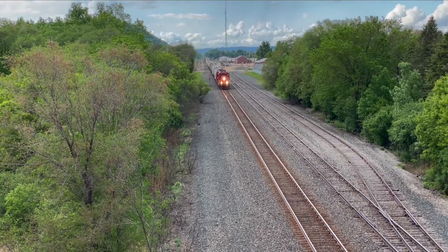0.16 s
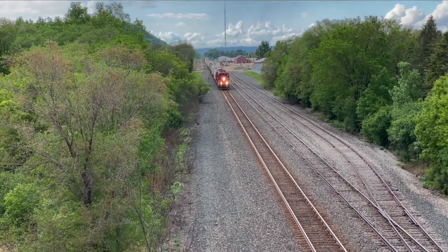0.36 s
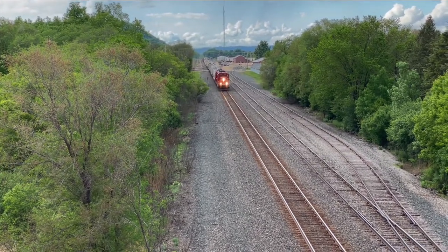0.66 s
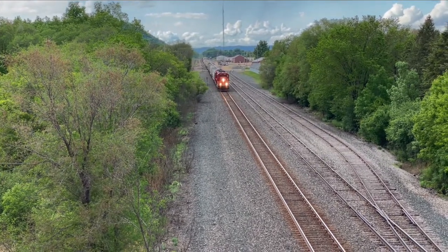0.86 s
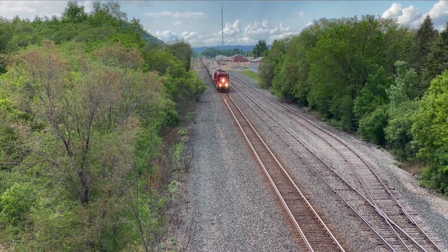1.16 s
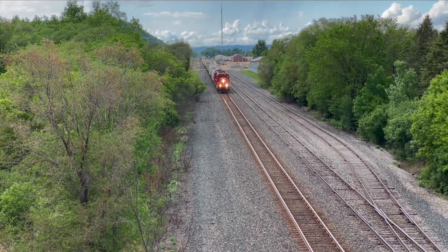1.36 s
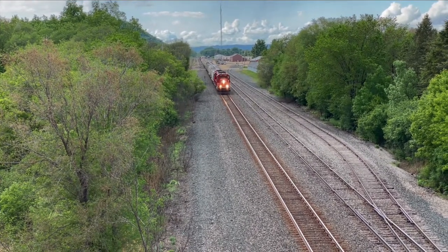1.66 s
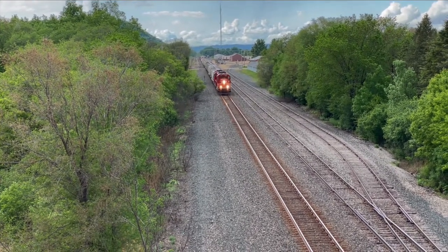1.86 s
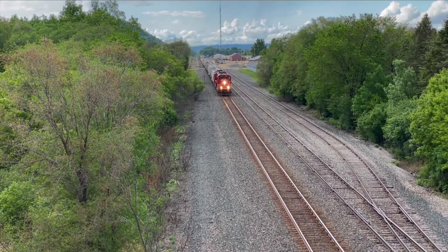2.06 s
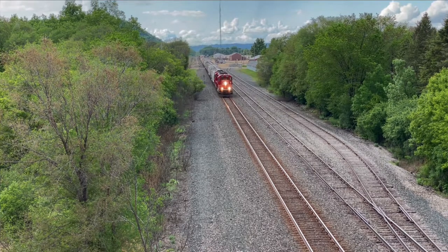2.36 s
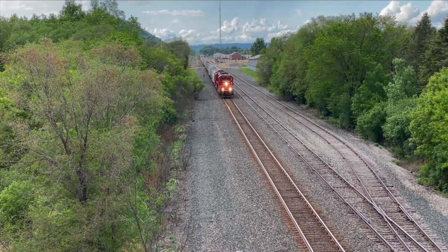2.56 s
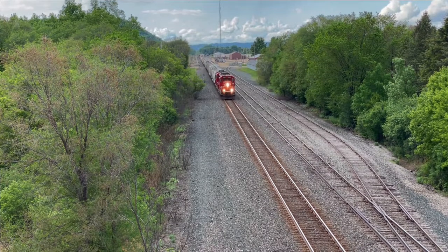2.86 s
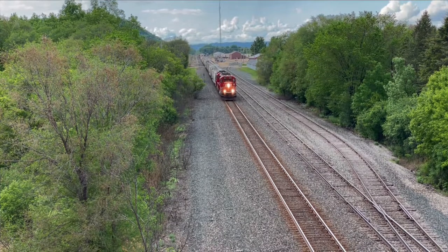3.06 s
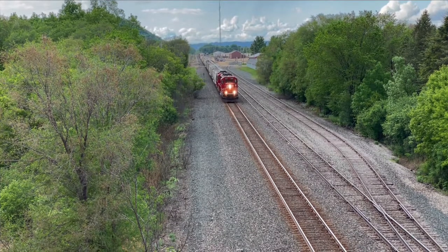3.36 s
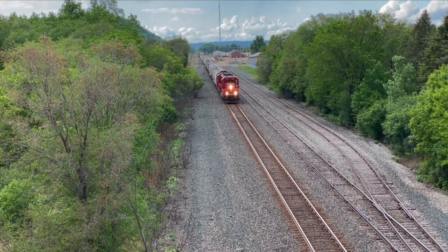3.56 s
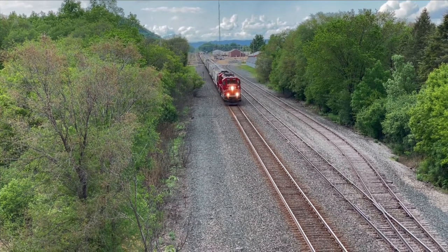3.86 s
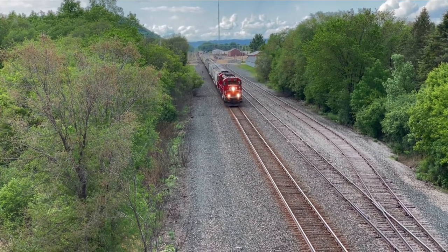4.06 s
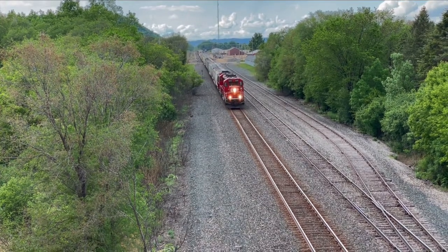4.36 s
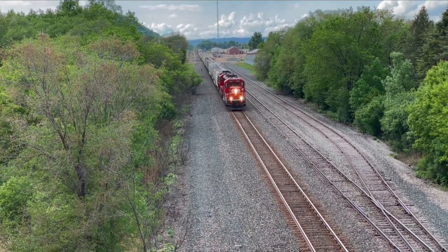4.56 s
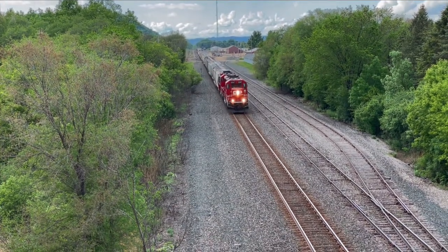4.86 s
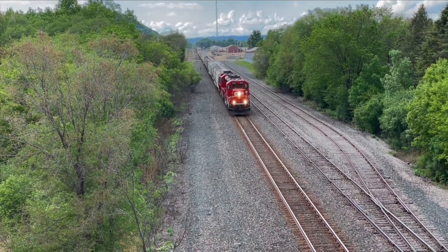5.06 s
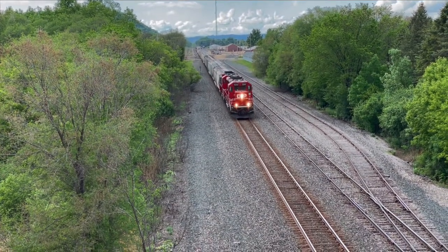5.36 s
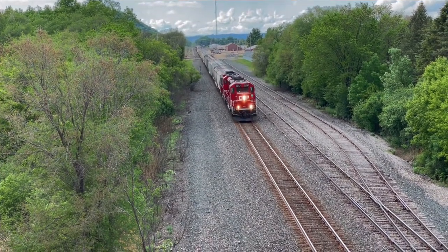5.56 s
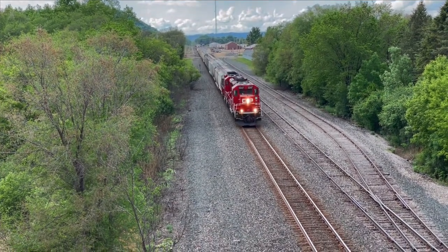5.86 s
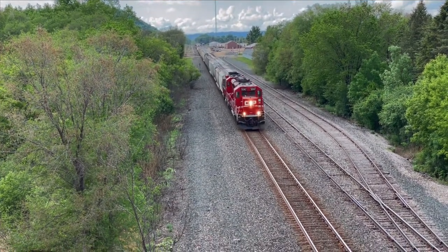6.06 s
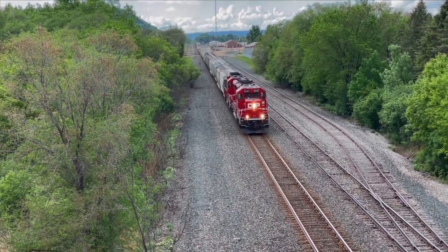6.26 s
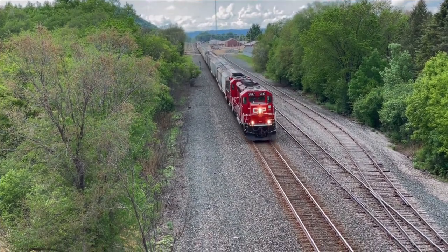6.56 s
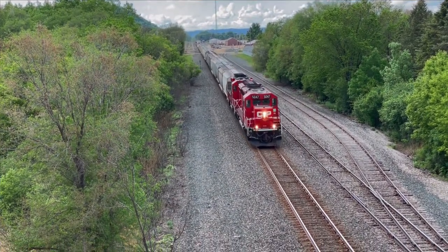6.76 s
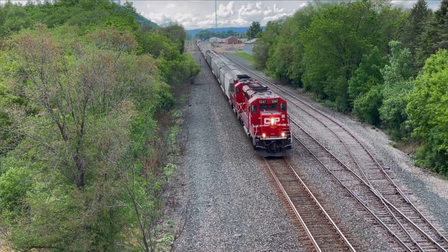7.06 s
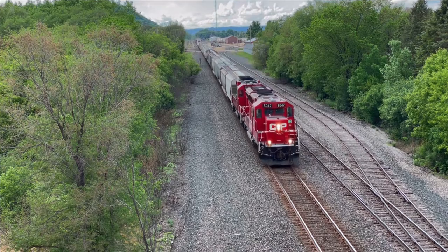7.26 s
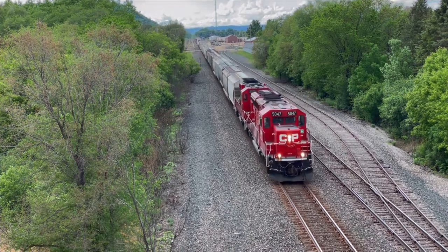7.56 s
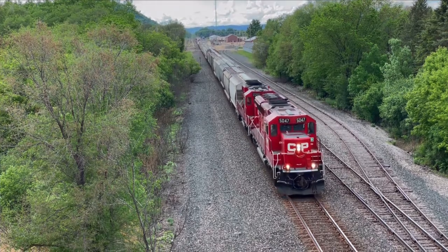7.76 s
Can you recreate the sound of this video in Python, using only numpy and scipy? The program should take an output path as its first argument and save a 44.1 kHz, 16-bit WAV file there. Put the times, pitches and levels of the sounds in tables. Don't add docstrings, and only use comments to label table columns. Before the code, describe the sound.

Deep diesel rumble grows as a heavy truck passes with droning exhaust and tyre hiss, then sinks away, leaving rustling wind and wheel knocks.

```python
import sys
import numpy as np
from scipy import signal
from scipy.fft import rfft, irfft
from scipy.io import wavfile
from scipy.ndimage import uniform_filter1d

SR = 44100
rng = np.random.default_rng(int(sys.argv[2]) if len(sys.argv) > 2 else 0)


def gain_from_db(level_db):
    decades = np.asarray(level_db, float) / 20
    return 10 ** decades


def wav_record(signal):
    frames = np.transpose(np.atleast_2d(signal))
    bounded = np.clip(frames, -1, 1)
    quanta = np.round(bounded * 32767).astype(np.int16)
    wavfile.write(sys.argv[1], SR, quanta)


N = 348831

TURN_S, TURN_DB = .93639, -14.5
TOP_HZ = 15720

# pitch in Hz, density in dB per Hz.
RUMBLE_COLOUR = [(22, -50), (32, -15), (42, -7.5), (55, -1.5), (100, -0.5), (150, -7.5), (220, -15),
                 (330, -21)]
ROAR_COLOUR = [(150, -0.5), (250, 3), (400, 1), (600, 2.5), (800, -0.5), (1000, -4.5), (1400, -14),
               (2200, -39.5)]
TYRE_COLOUR = [(700, 3), (1200, 2), (1600, 2), (2200, 1), (3000, -6), (4200, -10), (6000, -31)]
HISS_COLOUR = [(2000, -10.5), (3500, -0.5), (4800, -1), (5700, -6.5), (6800, -1), (7400, -6), (7800, -8),
               (9000, -9), (11500, -20.5), (13500, -41), (15000, -38), (15500, -40)]
AIR_COLOUR = [(9000, 2), (11000, 2.5), (13000, 1), (14100, 1), (15000, -15), (15500, -17)]
PUFF_COLOUR = [(9500, -35), (11500, -10), (13000, -10), (14100, -1), (14800, -9), (15300, -5), (15700, -7)]
KNOCK_COLOUR = [(250, 7), (500, 10), (750, -14), (980, 8.5), (1150, 1.5), (1400, -1), (1700, -4),
                (2500, -6.5), (4000, -10.5), (7000, -26)]

# time in seconds, level in dB.
GUSTS = [(0, -6.5), (.9, -6.5), (1.5, -8.5), (2.4, -4), (3.05, -0.5), (3.3, -1.5), (3.6, -11.5),
         (4.43, -10), (4.52, -3), (4.9, -6.5), (5.6, -14.5), (6.7, -9.5), (6.98, -0.5), (7.25, -2),
         (7.36, -9), (7.6, -3.5), (7.91, -6.5)]
# train dB when 3 s away, truck dB when nearest, gust dB, steepness against the gust.
RUMBLE_MIX, ROAR_MIX, TYRE_MIX = (-19, -19.5, -26, 0.43), (-23, -18, -27, 0.3), (-30.5, -24.5, -34, 0.56)
HISS_MIX, AIR_MIX = (-52, -44.5, -33.5, 0.92), (-51, -45.5, -38.5, 3.5)
TRAIN_ARRIVES_S = 9.5
TRUCK_NEAREST_S, TRUCK_SPAN_S = 5.29, 0.49

# time in seconds, share from the left 0-1, extra port lag in ms,
# left minus right in dB at 300 Hz, scatter 0-1.
BEARING = [
    (0, 0.78, 0.054, .6, 0.08),
    (3.4, 0.78, 0.059, .8, 0.1),
    (4.0, 0.95, 0.12, 0.5, 0.37),
    (4.6, 0.8, 0.19, 0.5, 0.23),
    (5.2, 1, 0.28, -1.5, 0.26),
    (5.8, 0.4, 0.18, -8, 0.62),
    (6.3, 0.02, -0.047, 1, 0.12),
    (7.9, 0, -0.021, -2, 0.08),
]
# pitch in Hz, lead in radians.
LEFT_LEAD = [(50, 0), (140, .4), (330, .5), (700, .75), (1600, .1), (2000, 0)]
# pitch in Hz, lead in radians.
FIXED_LEAD = [(2150, 0), (2600, .25), (3600, .65), (4600, .6), (5400, 0), (6000, -.6), (7000, -1.05),
              (8800, -3.14), (11000, -4.5), (13000, -6.28)]
# pitch in Hz, factor on the scatter.
UNLIKE_BY_SCATTER = [(60, 0.1), (140, 0.7), (330, 1), (700, 1.7), (1300, 0.34), (1700, 0.2), (2000, 0.14)]
# pitch in Hz, share 0-1.
UNLIKE_TREBLE = [(2300, 0), (3000, .04), (4600, .05), (5400, 0), (6200, .12), (7000, .17), (8800, .03),
                 (11000, .4), (13000, .02)]

# start in seconds, peak in dB, length in seconds.
KNOCKS = [
    (3.09, -27.5, 0.076),
    (6.75, -22.5, .015),
    (7.258, -16, 0.022),
]
# pitch in Hz, waver in Hz, start in seconds, stop in seconds, level in dB.
RINGS = [
    (1557, 4.1, 0.5, 1.2, -45),
    (2720, 3.5, -0.5, 1, -53),
    (1000, 7.7, 7, 8, -33),
]

# start in seconds, peak in dB, length in seconds.
PUFFS = [(2.0323, -50, 0.04), (2.0602, -53, 0.04), (2.7412, -41, 0.04), (3.4421, -43, 0.04),
         (3.4894, -45, 0.04), (3.5389, -43, 0.043), (3.5894, -48, 0.04), (4.1305, -50, 0.04),
         (4.4283, -42, 0.037), (4.5875, -49, 0.04), (4.8794, -49, 0.04), (5.0649, -48, 0.04),
         (5.1582, -47, 0.04), (5.3637, -43, 0.04), (5.5069, -47, 0.04), (5.6794, -57, 0.04),
         (5.8785, -41, 0.039), (5.9444, -36, 0.034), (6.6972, -36, 0.095), (6.7494, -34, 0.035),
         (7.3866, -40, 0.041), (7.4799, -45, 0.04)]
# pitch in Hz, width in Hz, level in dB.
VALVE_RESONANCES = [(12000, 32, -8), (12500, 38, -8), (13300, 130, -7), (13800, 84, -5), (14100, 65, 0),
                    (14400, 57, -6), (15100, 42, -3)]

# time in seconds, centre in Hz, level in dB.
RUSH = [
    (3.6, 3220, -59),
    (4.2, 2770, -46),
    (4.7, 2470, -45.5),
    (5.05, 2210, -40.5),
    (5.5, 1860, -43),
    (5.9, 1590, -45),
    (6.4, 1501, -71),
]

# time in seconds, level in dB.
LEAVING_SWELLS = [
    (.13, -12),
    (.47, -17),
    (.64, -15),
    (.84, -17),
    (1.0, -26),
    (1.33, -15),
]
LEAVING_HZ, SAG_HZ_PER_S, SWELL_S = 64, 3.88, 0.087

# time in seconds, cycle rate in Hz, level in dB.
TRUCK = [(0, 27.5, -22.5), (.9, 27.88, -21.5), (1.6, 28.1, -20.5), (2.75, 28.49, -17), (3.6, 29.01, -13.5),
         (4.5, 29.08, -9.5), (4.85, 28.9, -5), (5.35, 28.3, -3), (5.65, 27.53, -7.5), (6.1, 26.59, -5),
         (6.55, 26.01, -10), (6.95, 26.03, -12.5), (7.25, 25.58, -22), (7.91, 25.18, -20)]
REFERENCE_DB = -15
# time in seconds, lag in ms.
TRUCK_LAG = [(0, 0.074), (4.5, 0.0018), (5.4, 0.06), (6.0, -0.22), (7.9, -0.58)]
# dB at the reference level, share of the swell followed,
# dB change once past, time in seconds when it turns away.
GROUPS = [
    (1, 0.57, -11, 6.37),
    (0, 1.056, 0.3, 6),
    (-2.5, 0.9, -5, 6.02),
    (-15.5, 0.78, -5, 4.53),
    (-8.5, 0.98, -4.5, 5.33),
]
# order, group it
# follows, dB against that group.
EXHAUST_ORDERS = [(2, 0, -0.5), (3, 0, -6), (4, 0, -20.5), (5, 1, 0.5), (6, 2, -0.5), (7, 4, -1), (8, 1, -24),
                  (9, 3, -4), (10, 3, -2), (11, 3, 1.5), (12, 3, -6), (13, 3, -2), (14, 3, -6), (15, 3, -8),
                (17, 3, -6), (18, 3, -7), (24, 3, -7), (26, 3, -9), (16, 3, -5), (6.5, 2, -13)]
# time in seconds, group, depth in dB (negative lifts), half width in
# seconds.
NOTCHES = [(.09, 0, 8, 0.046), (.33, 0, 4, 0.098), (.77, 0, 20, 0.097), (1.24, 0, 14, 0.04),
           (1.66, 0, 8, 0.098), (2.97, 0, 6, .08), (4.1, 0, 2, 1), (4.58, 0, 5, .03), (6.27, 0, 5, 0.046),
           (6.6, 0, -1, .06), (5.06, 1, 12, 0.082), (6.31, 1, 15.5, 0.086), (7.0, 1, 10, .03),
           (4.58, 2, 6.5, 0.033), (4.82, 2, 4.5, 0.084), (5.26, 2, 6.5, .05), (6.08, 2, 10, .05),
           (6.67, 2, 12, .1)]
TURN_AWAY_S = 0.33


def on_log(table, hz):
    f, v = np.transpose(table)
    return np.interp(np.log(np.maximum(hz, 1)), np.log(f), v)


def walk(shape, steps):
    x = rng.standard_normal(shape)
    for axis, k in enumerate(steps):
        once = uniform_filter1d(x, k, axis=axis)
        x = uniform_filter1d(once, k, axis=axis)
    return x / x.std()


def slow_walk(t, steps):
    return np.interp(t, np.arange(800) / 100, walk((800,), (steps,)))


def mix_db(mix, t):
    train_db, truck_db, gust_db, steep = mix
    train = gain_from_db(2 * train_db) * (3 / (TRAIN_ARRIVES_S - t)) ** 2
    truck = gain_from_db(2 * truck_db) / (1 + ((t - TRUCK_NEAREST_S) / TRUCK_SPAN_S) ** 2)
    gust = gain_from_db(2 * (gust_db + steep * np.interp(t, *np.transpose(GUSTS))))
    return 10 * np.log10(train + truck + gust)


def bearing(hz, t):
    s, *columns = np.transpose(BEARING)
    left, lag_ms, pan_db, scatter = (np.interp(t, s, c) for c in columns)
    lag = 2 * np.pi * hz * lag_ms / 1000 / (1 + (hz / 1150) ** 6)
    lead = left * on_log(LEFT_LEAD, hz) + lag + on_log(FIXED_LEAD, hz)
    pan = pan_db * on_log([(60, 0), (330, 0.97), (700, .4), (1800, 0)], hz)
    pan = pan + 4.0 * left * on_log([(330, 0), (700, 0.97), (1900, 0.071)], hz)
    unlike = scatter * on_log(UNLIKE_BY_SCATTER, hz) + on_log(UNLIKE_TREBLE, hz)
    return lead, pan, np.clip(unlike, 0, .9)


def tone(hz, db, start, lag_ms=0):
    lead, pan_db, _ = bearing(hz, np.arange(N) / SR)
    phase = 2 * np.pi * (np.cumsum(hz) / SR + start)
    side = np.array([[.5], [-.5]])
    lead = lead + 2 * np.pi * hz * lag_ms / 1000
    return np.sqrt(2) * gain_from_db(db + side * pan_db) * np.cos(phase + side * lead)


def rumble():
    hz = np.fft.rfftfreq(N, 1 / SR)
    gain = gain_from_db(on_log(RUMBLE_COLOUR, hz) - 60 * (hz > 600))
    gain /= np.sqrt(np.sum(gain[(hz > 92) & (hz < 108)] ** 2) / len(hz))
    mid_and_side = np.array([hz ** 0, np.minimum(hz / 2500, 1)])
    mid, side = irfft(rfft(rng.standard_normal((2, N))) * gain * mid_and_side, N)
    level = gain_from_db(mix_db(RUMBLE_MIX, np.arange(N) / SR) - 3.0)
    return level * np.array([mid + side, mid - side])


def band_power(colour, hz, lo_hz, hi_hz):
    p = gain_from_db(2 * on_log(colour, hz))
    return p * len(hz) / p[(hz >= lo_hz) & (hz < hi_hz)].sum()


def roar_hiss_air(hz, t):
    roar = band_power(ROAR_COLOUR, hz, 400, 1000) * gain_from_db(2 * mix_db(ROAR_MIX, t) - 1.0)
    hiss = band_power(HISS_COLOUR, hz, 4900, 7800) * gain_from_db(2 * mix_db(HISS_MIX, t) + 2.5)
    air = band_power(AIR_COLOUR, hz, 12700, 15700) * gain_from_db(2 * mix_db(AIR_MIX, t) - 6.0)
    return roar + hiss + air


def bursts(events, t, rise_s, tail_db, tail_s):
    out = 1e-14
    for s, db, length in events:
        age = np.clip(t - s, 0, None)
        rise = 1 - np.exp(-age / rise_s)
        decay = np.exp(-(age / length) ** 2) + gain_from_db(2 * tail_db) * np.exp(-age / tail_s)
        out = out + gain_from_db(2 * (db - TURN_DB)) * rise * decay
    return out


def rail_knocks(hz, t):
    blows = bursts(KNOCKS, t, rise_s=0.0029, tail_db=-9.5, tail_s=0.1)
    return band_power(KNOCK_COLOUR, hz, 1000, 4000) * blows * gain_from_db(-26.5)


def air_puffs(hz, t):
    resonance = 1
    for f, width, db in VALVE_RESONANCES:
        resonance = resonance + gain_from_db(2 * db + 12) / (1 + ((hz - f) / width) ** 2) * 4000 / f
    jets = bursts(PUFFS, t, rise_s=0.0084, tail_db=-11, tail_s=0.12)
    return resonance * band_power(PUFF_COLOUR, hz, 13000, 15720) * jets * gain_from_db(-19)


def tyres_and_rush(hz, t):
    tyres = band_power(TYRE_COLOUR, hz, 1600, 2800) * gain_from_db(2 * mix_db(TYRE_MIX, t) - 2.5)
    s, rush_hz, rush_db = np.transpose(RUSH)
    bell = np.exp(-(np.log(np.maximum(hz, 1) / np.interp(t, s, rush_hz)) / 0.24) ** 2)
    rush = bell * len(hz) / bell.sum(axis=0) * gain_from_db(2 * (np.interp(t, s, rush_db) - TURN_DB))
    near = 1 / np.sqrt(1 + ((t - 5.25) / .6) ** 2)
    comb = 1 + .7 * near * np.cos(2 * np.pi * hz * .0026 * near)
    return comb * (rush + tyres)


def noises():
    hz, t, z = signal.stft(rng.standard_normal((3, N)), SR, nperseg=512, noverlap=384)
    hz = hz[:, None]
    p = roar_hiss_air(hz, t) + tyres_and_rush(hz, t)
    flicker = .5 * walk(p.shape, (8, 30)) + 0.44 * walk(p.shape, (40, 6))
    p = p * gain_from_db(2 * flicker)
    p = p + air_puffs(hz, t) + rail_knocks(hz, t)
    lead, pan_db, unlike = bearing(hz, t)
    ahead = on_log([(200, 0.62), (400, 1.1), (600, 1.1)], hz) ** (hz < 1500)
    lead, unlike = lead * ahead, unlike * ahead
    side = np.array([.5, -.5])[:, None, None]
    shared = np.sqrt(1 - unlike) * z[0] * np.exp(1j * side * lead)
    pair = shared + np.sqrt(unlike) * z[1:]
    spectrum = pair * np.sqrt(p * (hz < TOP_HZ)) * gain_from_db(side * pan_db)
    return signal.istft(spectrum, SR, nperseg=512, noverlap=384)[1][:, :N]


def steel():
    t, out = np.arange(N) / SR, 0
    for hz, width_hz, start, stop, db in RINGS:
        waver = slow_walk(t, 4)
        gate_db = -60 * (np.clip(start - t, 0, None) + np.clip(t - stop, 0, None))
        out = out + tone(hz + width_hz * waver, db + gate_db + 0.72 * waver[::-1], start=0)
    return out


def leaving_engine():
    t = np.arange(N) / SR
    swells = 1e-9
    for at_s, db in LEAVING_SWELLS:
        swells = swells + gain_from_db(db) * np.exp(-((t - at_s) / SWELL_S) ** 2)
    return tone(LEAVING_HZ - SAG_HZ_PER_S * t, 20 * np.log10(swells), start=0)


def group_levels(t, swell_db):
    levels = []
    for db, share, past_db, past_s in GROUPS:
        past = .5 + .5 * np.tanh((t - past_s) / TURN_AWAY_S)
        levels.append(REFERENCE_DB + db + share * swell_db + past_db * past)
    for at_s, group, depth_db, half_s in NOTCHES:
        notch_db = depth_db / (1 + ((t - at_s) / half_s) ** 2)
        levels[round(group)] = levels[round(group)] - notch_db
    return levels


def truck_engine():
    t = np.arange(N) / SR
    s, rate_hz, level_db = np.transpose(TRUCK)
    hz = uniform_filter1d(np.interp(t, s, rate_hz), SR // 3, mode="nearest")
    levels = group_levels(t, np.interp(t, s, level_db) - REFERENCE_DB)
    near = np.exp(-((t - 5.4) / .7) ** 2)
    lag_ms = np.interp(t, *np.transpose(TRUCK_LAG))
    out = 0
    for order, group, db in EXHAUST_ORDERS:
        depth_db = min(0.065 * order, 1.3) + 3.53 * near * (group == 3)
        fade_db = depth_db * slow_walk(t, 10)
        start = .5 - .08 * order ** 2
        out = out + tone(order * hz, levels[group] + db + fade_db, start=start, lag_ms=lag_ms)
    return out


def scene():
    return rumble() + noises() + steel() + leaving_engine() + truck_engine()


def top_cut(x):
    return signal.sosfilt(signal.butter(12, 15810, fs=SR, output="sos"), x)


def record(dry):
    turned_down = np.arange(N) / SR > TURN_S
    gain = uniform_filter1d(gain_from_db(TURN_DB * turned_down), size=3)
    return top_cut(dry * gain)


dry = scene()
out = record(dry)
wav_record(out)
```